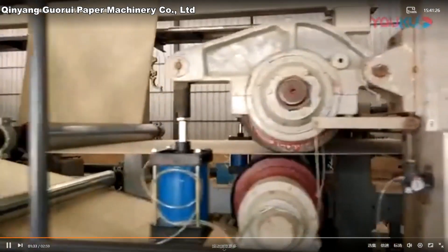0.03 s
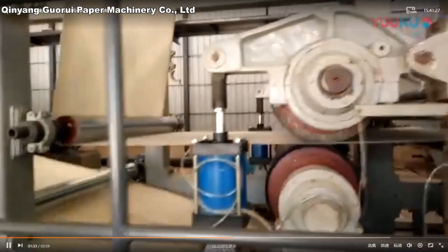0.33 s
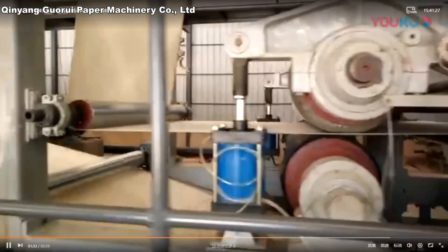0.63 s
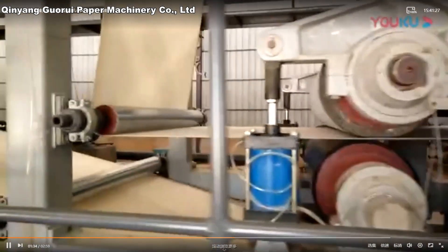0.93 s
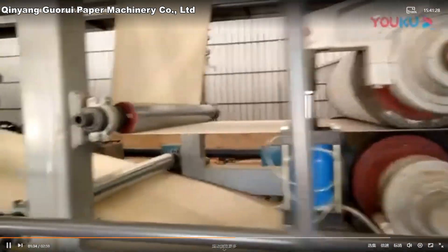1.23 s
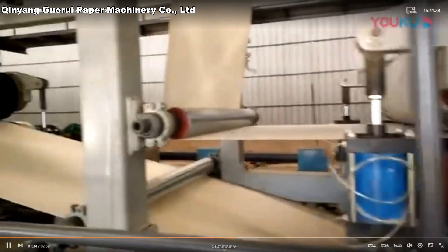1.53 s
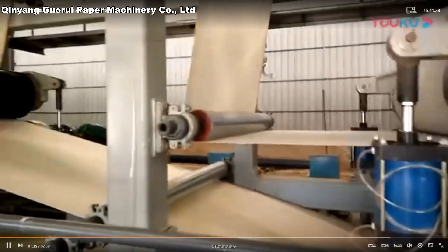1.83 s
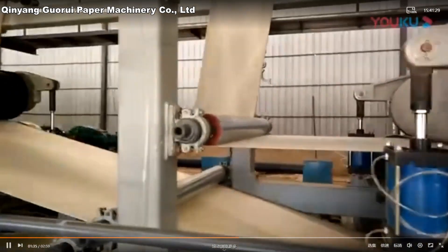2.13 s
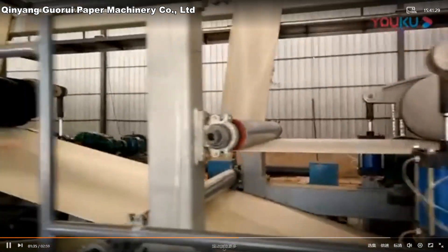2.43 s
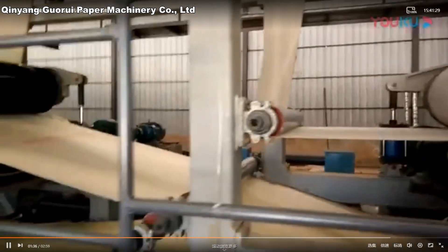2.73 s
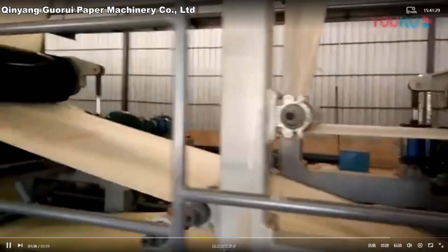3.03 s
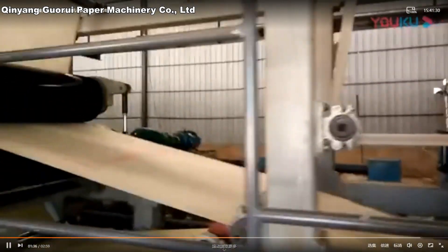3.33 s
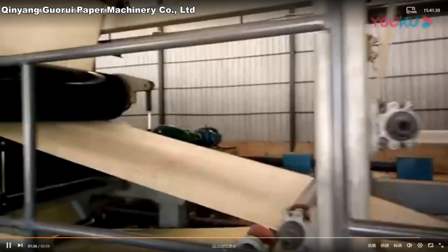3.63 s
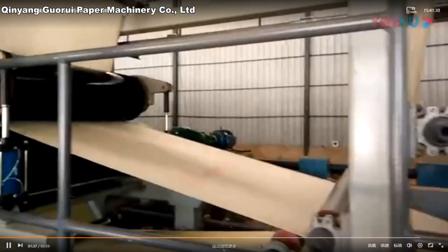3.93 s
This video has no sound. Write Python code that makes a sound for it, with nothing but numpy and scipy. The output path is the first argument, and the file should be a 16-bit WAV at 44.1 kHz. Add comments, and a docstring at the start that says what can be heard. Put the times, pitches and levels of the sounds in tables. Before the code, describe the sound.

A large paper machine runs with a steady roar, throbbing hum and gear whine.

```python
"""A factory hall, where a paper machine runs while the microphone is carried slowly along it.
The rolls and the running sheet of paper make a steady roar and hiss; motors and bearings sing faintly.
A shaft turning about 16 times a second throbs in the bass, and the meshing teeth of its gear whine.
Single tones swell and fade as the walk passes the hall's loud and quiet spots (standing waves)."""
import sys
import numpy as np
from scipy import signal
from scipy.io import wavfile
from scipy.ndimage import uniform_filter1d

SR = 44100
rng = np.random.default_rng(int(sys.argv[2]) if len(sys.argv) > 2 else 0)


def output_pcm(signal):
    """Save a mono or channel-first signal as 16-bit PCM at the path in sys.argv[1].

    Samples are clipped to [-1, 1] before scaling.
    """
    pcm = np.clip(np.atleast_2d(signal).T, -1, 1) * 32767
    wavfile.write(sys.argv[1], SR, np.round(pcm).astype(np.int16))


N = 176400

SHAFT_HZ, TEETH = 15.956, 34
DRIFT_HZ = .48  # how fast tones drift along the walk


def amp(db):
    """Turns decibels into a gain."""
    return 10 ** (np.asarray(db) / 20)


def unit_rms(x):
    """Scales a signal to an average size (rms) of 1."""
    return x / np.sqrt(np.mean(abs(x) ** 2) + 1e-20)


def at_pitch(points, hz):
    """Looks up a table at hz, on a log-frequency axis."""
    f, value = np.transpose(points)
    return np.interp(np.log(hz + 1), np.log(f + 1), value)


def at_time(points, t):
    """Looks up each column of a table at the times t."""
    times, *columns = np.transpose(points)
    return np.array([np.interp(t, times, column) for column in columns])


def wander(rate_hz):
    """A smooth random wobble in size and phase (complex, rms 1), up to about rate_hz fast."""
    f = np.fft.fftfreq(4096, 1 / 400)
    phases = np.exp(2j * np.pi * rng.random(len(f)))
    wobble = np.fft.ifft(phases / np.sqrt(1 + (f / rate_hz) ** 6))
    return np.interp(np.arange(N) / SR, np.arange(len(f)) / 400, unit_rms(wobble))


def stereo(middle, spread, hz):
    """Mixes two signals into left and right: centred in the bass and top treble, wide in between."""
    # how alike the two ears are: f/Hz, likeness (1 = the same)
    likeness = [(30, .999), (70, .992), (120, .93), (250, .89), (500, .55), (1000, .03), (2000, .0),
                (5000, .08), (8500, .8), (12000, .72)]
    same = at_pitch(likeness, hz)
    side = np.sqrt((1 - same) / (1 + same)) * spread
    return np.array([middle + side, middle - side])


def roar():
    """Rolls and running paper fill the hall with noise that flickers and swells slightly."""
    # tone colour of the roar and hiss: f/Hz, level/dB per Hz
    spectrum = [(15, -70), (30, -49), (60, -63.5), (80, -59.5), (100, -46), (140, -58.5), (200, -58.5),
                (260, -59), (320, -65.5), (400, -63), (480, -64.5), (550, -59.5), (640, -65.5), (800, -65),
                (1000, -68), (1250, -71.5), (1800, -74.5), (2700, -77), (4500, -78), (6000, -77),
                (7200, -86), (8800, -85.5), (11000, -92.5), (12800, -102)]
    # balance between the ears: f/Hz, left minus right/dB
    balance = [(500, -1), (2500, -0.5), (4500, -0.5), (6000, 2), (7200, 2.5), (8700, -9.5), (11000, -4.5),
               (12500, -3.5)]
    # slow change in the hiss: t/s, level/dB
    hiss = [(0, -0.1), (1.3, .5), (2.4, -.5), (3.2, -0.7), (4, 0)]
    size, hop = 2048, 512
    frames, hz = N // hop + 5, np.fft.rfftfreq(size, 1 / SR)
    t = np.arange(frames) * hop / SR
    noise = rng.standard_normal((2, (frames - 1) * hop))
    middle, spread = signal.stft(noise, nperseg=size, noverlap=size - hop)[2].transpose(0, 2, 1)
    flicker = uniform_filter1d(rng.standard_normal(middle.shape), size=6, axis=0)  # smooth in time
    flicker_db = unit_rms(uniform_filter1d(flicker, size=24, axis=1))  # and in pitch
    swell_db = .15 * unit_rms(uniform_filter1d(rng.standard_normal((frames, 1)), size=30, axis=0))
    treble = hz / (hz + 1500)
    db = at_pitch(spectrum, hz) + flicker_db + swell_db + treble * at_time(hiss, t).T
    ear_db = np.array([.5, -.5])[:, None, None] * at_pitch(balance, hz)
    shaped = stereo(middle, spread, hz) * amp(db + ear_db)
    sound = signal.istft(shaped.transpose(0, 2, 1), nperseg=size, noverlap=size - hop)[1]
    return np.sqrt(SR / 2) * sound[:, :N]


def motors():
    """Motors and bearings sing thin, wavering tones; most fade as the walk leaves them behind."""
    # the thin tones: f/Hz, starting level/dB, final level/dB
    tones = [(1474, -50, -53.5), (2036, -50, -55.5), (2123, -52, -62), (7700, -72, -70)]
    settle_s = .48
    t, out = np.arange(N) / SR, np.zeros((2, N))
    for hz, start_db, final_db in tones:
        waver = stereo(wander(rate_hz=10), wander(rate_hz=10), hz)
        db = final_db + (start_db - final_db) * np.exp(-t / settle_s)
        out += np.sqrt(2) * amp(db) * (waver * np.exp(2j * np.pi * hz * t)).real
    return out


def shaft_turns():
    """Counts the turns of the shaft, whose speed is very slightly uneven."""
    first_throb_s = .053
    return SHAFT_HZ * (np.arange(N) / SR - first_throb_s) + .0005 * wander(rate_hz=2).real


def shaft_throb(turns):
    """Each turn gives a knock, then the frame booms and rings; the hall smears them into a hum."""
    # tones that swell and fade along the walk: multiple of the shaft rate -> t/s, level/dB
    swelling = { 6: [(0, -46), (.2, -32), (.3, -25), (.43, -33.5), (1.1, -35), (1.6, -29), (2, -24),
                (2.6, -23.5), (3.5, -27.5), (4, -37)], 9: [(0, -48), (.7, -38), (1, -40), (1.7, -35.5),
                (2.4, -35), (4, -59)], 10: [(0, -34.5), (1.2, -36), (1.7, -32.5), (2.4, -33), (3.2, -29),
                (3.55, -27.5), (4, -25.5)], 11: [(0, -26), (.65, -28), (1.1, -30.5), (1.8, -34), (3, -35),
                (3.55, -30.5), (4, -29.5)], 12: [(0, -31), (.9, -34.5), (1.6, -32.5), (3, -31), (3.55, -37),
                (4, -43)], 13: [(0, -43), (.5, -47), (1.4, -39.5), (2.8, -36.5), (4, -52)], 14: [(0, -36),
                (.45, -34.5), (1, -46), (1.6, -40), (2.3, -33.5), (3.2, -31), (4, -37)], 18: [(0, -36.5),
                (.7, -38.5), (1.5, -44.5), (2, -56), (2.8, -49), (4, -59)], 39: [(0, -41), (.6, -55),
                (1.3, -49), (1.7, -40.5), (2.7, -44), (3.3, -54), (4, -49)], 42: [(0, -48), (1.2, -43),
                (1.8, -56), (2.8, -50), (3.3, -46), (4, -51)], 45: [(0, -49), (1.6, -51), (2, -49),
                (2.4, -53.5), (3.2, -46), (4, -45)], 48: [(0, -53), (.6, -54), (1.2, -48), (2.6, -57),
                (3.4, -43.5), (4, -52)], }
    # steadier tones: multiple of the shaft rate, level/dB
    steady = [(2, -50), (2.5, -58), (4, -31), (5, -47.5), (7, -34), (7.5, -43.5), (8, -38.5), (12.5, -54),
              (13.5, -46.5), (14.5, -48.5), (15, -47.5), (16, -50), (17, -47), (34.5, -45.5), (53, -51.5),
              (56, -48.5), (64, -54.5)]
    boom_lag_s, boom_below_hz = .01593, 138.7
    ring_lag_s, ring_above_hz = .02, 185.1
    knock_turns, gain_db = -.0594, -.24
    t, out = np.arange(N) / SR, np.zeros((2, N))
    tones = [(multiple, at_time(curve, t)[0], .3) for multiple, curve in swelling.items()]
    tones += [(multiple, db, 1) for multiple, db in steady]
    for multiple, db, drift_scale in tones:
        hz = multiple * SHAFT_HZ
        drift = min(drift_scale * .506 * hz / 500, .9)  # higher tones drift more along the walk
        middle = np.sqrt(1 - drift ** 2) + drift * wander(DRIFT_HZ)
        ears = stereo(middle, .35 * wander(DRIFT_HZ), hz)
        smear_rad = 1.05 * max(hz / 200, .6) * rng.standard_normal()
        lag_cycles = boom_lag_s * min(hz, boom_below_hz) + ring_lag_s * max(hz - ring_above_hz, 0)
        phase = 2 * np.pi * (multiple * (turns - knock_turns) - lag_cycles) + smear_rad
        out += np.sqrt(2) * amp(db) * (ears * np.exp(1j * phase)).real
    return amp(gain_db) * out


def gear_whine(turns):
    """Meshing teeth whine, drifting between the ears; tones close by make it beat once a turn."""
    # strength of the whine: t/s, left level/dB, right level/dB
    levels = [(0, -31, -28.5), (.3, -32, -29), (.57, -29.5, -34), (.85, -33, -29.5), (.98, -51, -33.5),
              (1.13, -31, -42), (1.26, -28.5, -35), (1.3, -25.5, -31.5), (1.38, -25, -28),
              (1.7, -24, -26.5), (2, -23, -27.5), (2.33, -20.5, -25), (2.72, -24, -22.5), (3.1, -23.5, -22),
              (3.6, -26, -25.5), (4, -24, -25.5)]
    # how far the left ear is ahead of the right: t/s, phase/rad
    left_lead = [(0, -0.14), (.4, 1.4), (.8, 0.92), (1.05, -2), (1.4, 0.21), (2, 0.62), (3.15, 0.76),
                 (4, -0.69)]
    # where in the turn the beat falls: t/s, position/turns
    beat_position = [(0, -0.17), (.6, 0.17), (1, 0.11), (1.3, -.22), (2.2, -0.21), (2.8, -.12),
                     (3.5, 0.0052), (4, -0.14)]
    # tones beside the whine: distance in shaft rates -> t/s, level/dB
    side_tones = { -1: [(0, -47), (.9, -43), (1.3, -49), (1.9, -44), (2.5, -47), (3.2, -38), (4, -41.5)],
                  1: [(0, -34.5), (.55, -32), (1, -37.5), (1.3, -39.5), (2.1, -40), (2.4, -44), (2.8, -34),
                  (3.2, -32.5), (4, -29.5)], 2: [(0, -32.5), (.6, -37.5), (1.25, -49), (1.6, -42),
                  (2, -38.5), (2.55, -45), (3.35, -42), (4, -53)], 3: [(0, -39), (.7, -64), (1.1, -45.5),
                  (2, -38.5), (2.8, -39.5), (3.2, -41), (3.6, -58), (4, -55)], }
    side_gain_db = 1.5
    smear_rad = -.87  # smears the beat: partly a swell in loudness, partly a pitch wobble
    t = np.arange(N) / SR
    tooth_phase = 2 * np.pi * TEETH * turns
    ear_phase = tooth_phase + at_time(left_lead, t) * np.array([[.5], [-.5]])
    roughness = 1 + .11 * wander(rate_hz=30)
    whine = amp(at_time(levels, t)) * np.exp(1j * ear_phase) * roughness
    beat_phase = 2 * np.pi * (turns - at_time(beat_position, t))
    for step, curve in side_tones.items():
        ears = stereo(.9, .48 * wander(DRIFT_HZ), TEETH * SHAFT_HZ)
        phase = tooth_phase + step * beat_phase + smear_rad * step ** 2
        whine += amp(side_gain_db + at_time(curve, t)) * ears * np.exp(1j * phase)
    return np.sqrt(2) * whine.real


def scene():
    """One shaft drives both throb and whine, over the motors and the roar."""
    turns = shaft_turns()
    return shaft_throb(turns) + gear_whine(turns) + motors() + roar()


def record(dry):
    """Cuts off the highest treble."""
    lowpass = signal.firwin(511, cutoff=13100, window=("kaiser", 9), fs=SR)
    return signal.oaconvolve(dry, lowpass[None], "same")


dry = scene()
out = record(dry)
output_pcm(out)
```